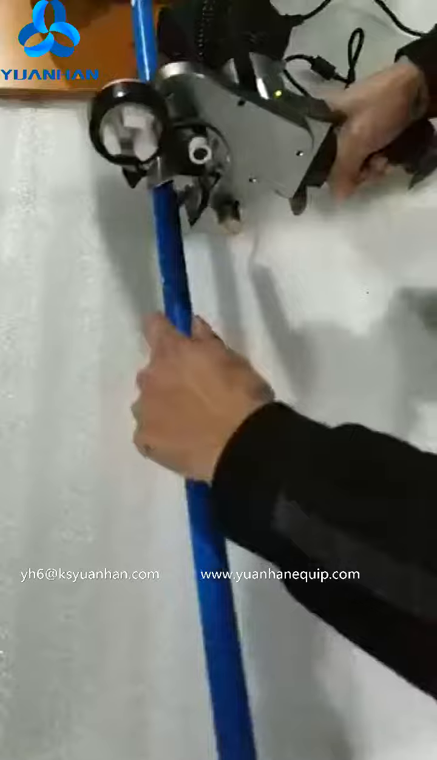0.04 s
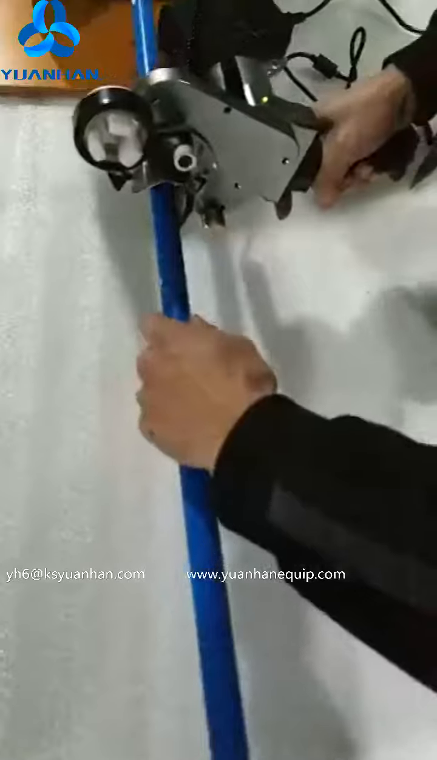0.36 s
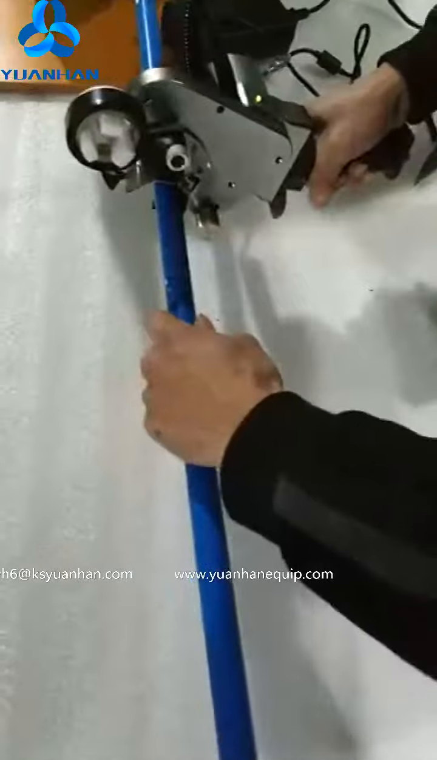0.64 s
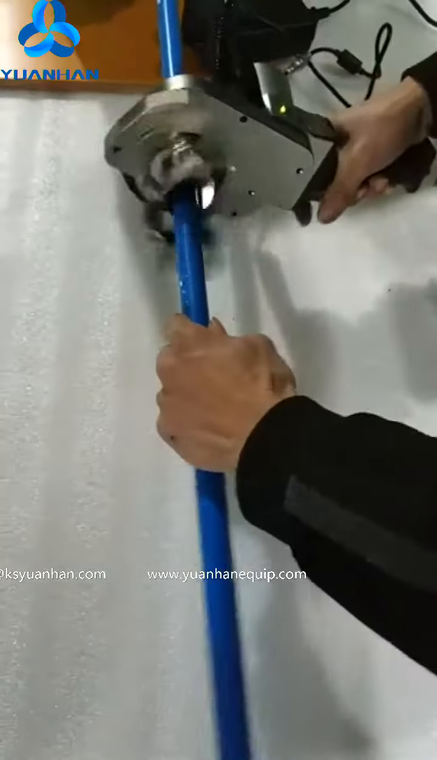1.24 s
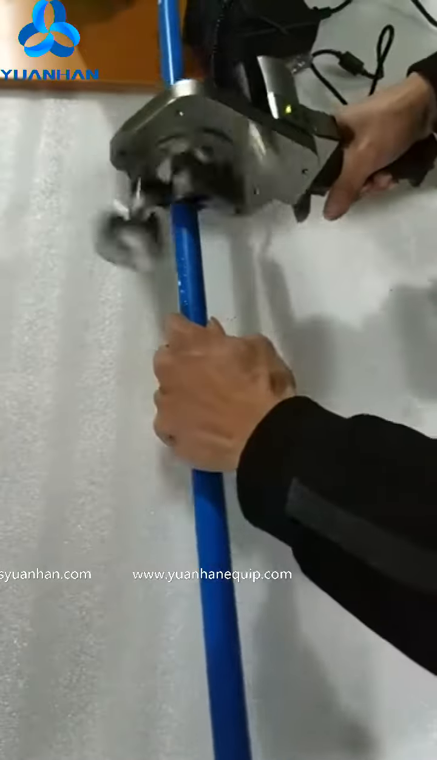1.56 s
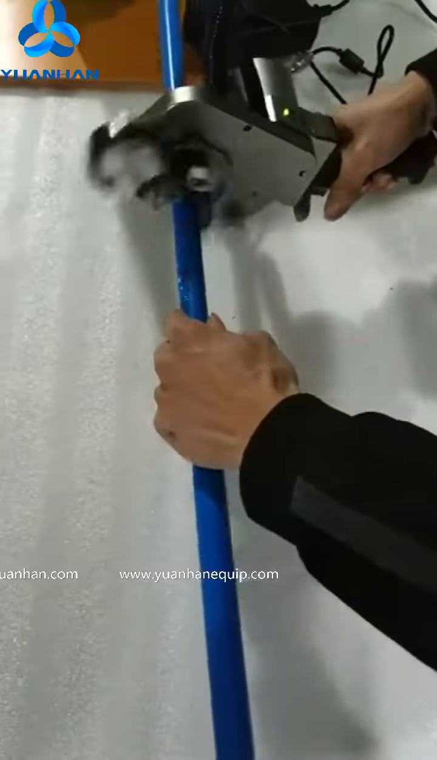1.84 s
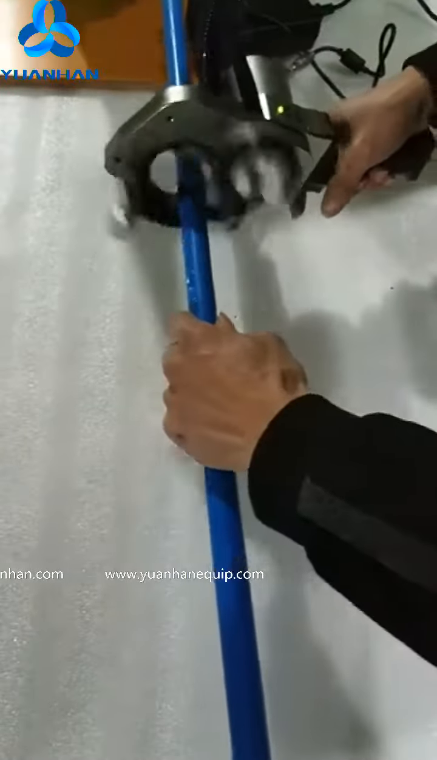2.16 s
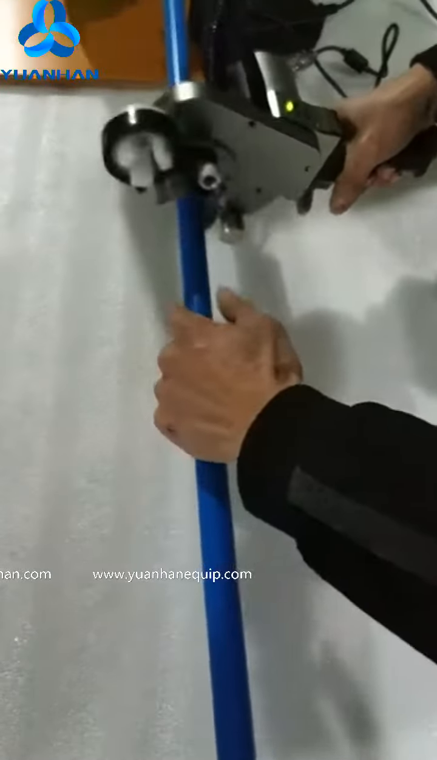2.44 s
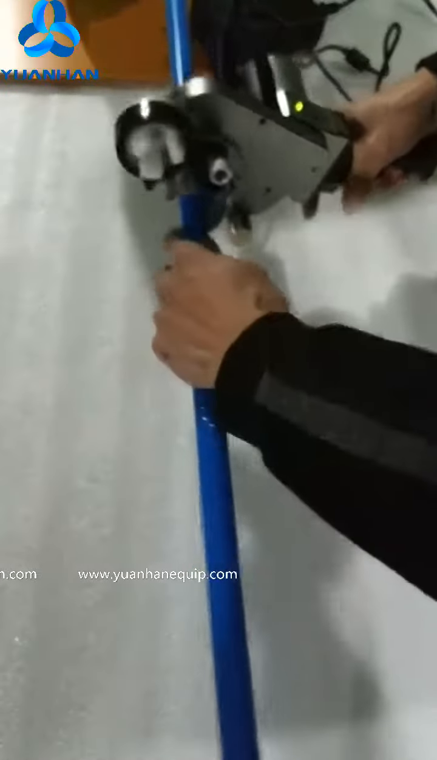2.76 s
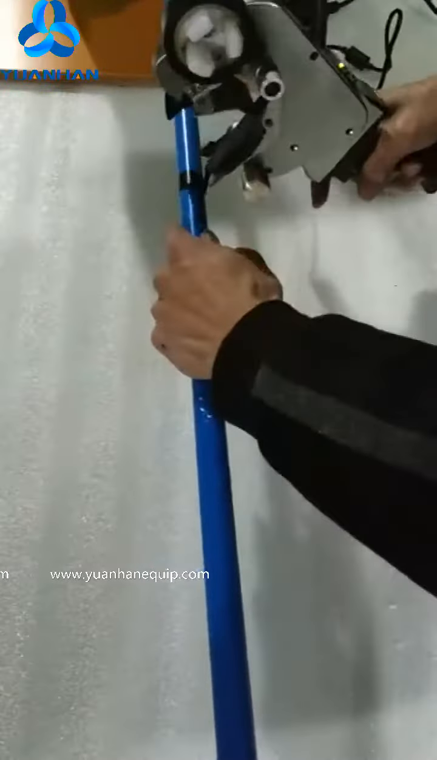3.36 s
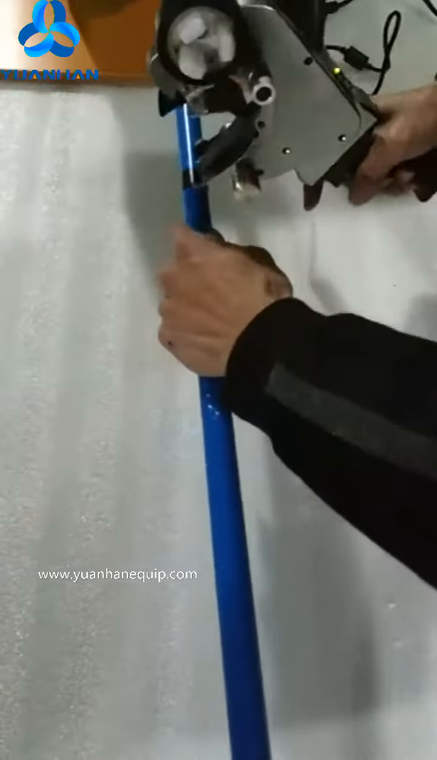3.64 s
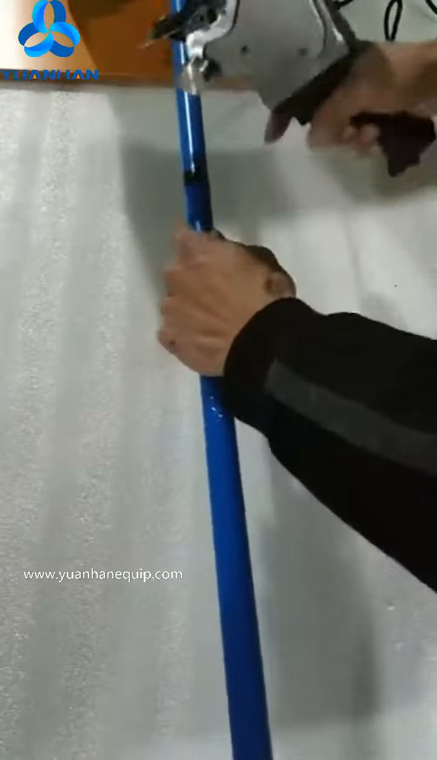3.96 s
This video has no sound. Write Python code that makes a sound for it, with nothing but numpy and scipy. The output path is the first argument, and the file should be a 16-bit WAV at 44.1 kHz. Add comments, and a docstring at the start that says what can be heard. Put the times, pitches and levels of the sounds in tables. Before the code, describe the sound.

Tape crackles off a small spinning wrapping tool, is pulled in short rasps and gets chopped.

```python
"""A workshop hums; then the trigger of a handheld taping machine clicks. Its geared ring spins round a
cable bundle for just over a second, the gear ringing the housing while glue threads snap and crackle off
the tape roll, and it stops with a snap. The tool is drawn away, stripping more tape in short stick-slip
rasps. The cutter chops the tape with a clack and a hollow knock, and loose parts jingle on."""
import sys
import numpy as np
from scipy import signal
from scipy.fft import rfft, irfft, next_fast_len
from scipy.io import wavfile
from scipy.ndimage import uniform_filter1d, map_coordinates

SR = 44100
rng = np.random.default_rng(int(sys.argv[2]) if len(sys.argv) > 2 else 0)


def digitize_waveform(pressure):
    """Quantize a signal to 16-bit integers and store it at the path in sys.argv[1].

    Rows of a 2-D input are taken as channels; values are limited to [-1, 1].
    """
    field = np.atleast_2d(pressure).T
    bounded = np.clip(field, -1, 1)
    quanta = np.round(bounded * 32767).astype(np.int16)
    wavfile.write(sys.argv[1], SR, quanta)


N = 176400

# Workshop background: time_s, rumble_db, air_db
ROOM_LEVELS = [(0.05, -98, -100), (0.09, -61, -58.5), (0.3, -43.5, -48), (0.7, -46.5, -50),
               (1.6, -42.5, -48.5), (2.7, -42, -53.5), (3.5, -43, -51.5), (4.0, -43, -50.5)]
# Two machine hums: time_s, lower_db, upper_db
HUM_LEVELS = [(0.08, -81, -69), (0.5, -49, -56.5), (2.2, -42.5, -54), (2.8, -44, -58.5),
              (3.25, -45.5, -43.5), (4.0, -43, -55.5)]
# Spectra of the rumble and the ventilation: frequency_hz, level_db
RUMBLE_SPECTRUM = [(13, -31), (22, 1.5), (38, -6.5), (54, -1), (102, -8.5), (140, -11.5), (157, -21),
                   (210, -32), (250, -37.5), (320, -55.5), (550, -120)]
AIR_SPECTRUM = [(90, -0.5), (180, 6), (300, -0.5), (600, -2.5), (950, 2), (1400, -9.5), (2100, -16.5),
                (4000, -26), (7400, -27.5), (7800, -62)]
# Left-right likeness of the diffuse field: frequency_hz, coherence
COHERENCE = [(60, 1), (160, 0.97), (280, 1), (500, 0.64), (1100, 0), (3000, 0)]
# Reverberation time of the workshop: frequency_hz, t60_s
REVERB_TIMES = [(200, 0.52), (1000, 0.55), (4000, 0.5), (7500, 0.43)]
# Phase lag of the tool's direct sound on the left: frequency_hz, lag_rad
LEFT_LAG = [(50, .05), (300, 0.33), (700, 1.3), (1300, 1.08), (1900, 1.69), (3000, 4.91), (4000, 4.46),
            (5000, 5.43), (6200, 7.8), (7400, 7.76)]

# Hands rustling, the bundle shifting, the jaw scraping: centre_s, level_db, half_width_s
RUSTLE_SWELLS = [(0.91, -61.5, 0.016), (1.01, -64.5, 0.075), (1.115, -54, 0.047), (2.46, -65, 0.085),
                 (2.72, -61, 0.13), (3.06, -60, 0.018), (3.66, -65, 0.016), (3.77, -67.5, 0.034)]
SHIFT_SWELLS = [(1.66, -43.5, 0.066), (2.67, -39, 0.03), (2.86, -35, 0.13)]
SCRAPE_SWELLS = [(2.865, -40, 0.023), (2.93, -49, 0.05)]
# Their spectra: frequency_hz, level_db
RUSTLE_SPECTRUM = [(250, 6.5), (900, -7), (2000, 2), (3700, -0.5), (5500, 0.5), (7400, 2), (7800, -54),
                   (8500, -99)]
SHIFT_SPECTRUM = [(20, -16.5), (35, 7.5), (52, 15), (70, -6.5), (110, -20), (250, -53.5), (1000, -110)]
SCRAPE_SPECTRUM = [(150, -26.5), (310, -2), (400, -4), (520, -14), (690, 6), (850, -21.5), (1200, -14),
                   (3000, -49), (8000, -84)]

# Modes of the housing: pitch_hz, level_db, t60_s
HOUSING_MODES = [(244, -10.5, 0.046), (307, 0.5, 0.14), (360.3, -7, 0.1), (418.6, -5, 0.099),
                 (511, -11.5, 0.073), (709, -13, 0.11), (1700, -16, 0.027)]
# Knocks on the housing: start_s, level_db, noise_t60_s, relative_thump_db
HOUSING_KNOCKS = [(1.304, -35, 0.057, 7.5), (1.825, -35.5, 0.083, -2.5), (2.301, -39.5, 0.071, -5),
                  (2.876, -35, 0.05, -13), (2.983, -29.5, 0.036, -12), (3.826, -24, 0.052, -3),
                  (3.857, -37.5, 0.038, -9.5)]
# Clicks of trigger, ring and cutter: start_s, level_db, length_s, relative_clack_db, clack_hz
TOOL_CLICKS = [(0.967, -39, 0.0053, -11, 3330), (1.064, -30, 0.0069, -9, 2800),
               (1.162, -37, 0.0074, -11, 2900), (1.176, -22.5, 0.0061, 1.5, 2840),
               (2.358, -27, 0.0068, 1, 2180), (3.718, -46.5, 0.0056, -6.5, 3300),
               (3.797, -47.5, 0.0075, -8, 3380), (3.805, -41.5, 0.0058, -12, 3300),
               (3.8236, -22, 0.0054, -10.5, 2600)]
# Spectrum of a click's clack: pitch_ratio, level_db
CLACK_SPECTRUM = [(.2, -28), (.55, -15.5), (0.801, -12), (1, 2.5), (1.15, -6), (1.42, -1.5), (1.8, -19.5),
                  (3, -45.5)]
# Spectra of a knock's rattle and thump, a click's treble, the loose parts: frequency_hz, level_db
RATTLE_SPECTRUM = [(100, -29), (300, 12), (700, -6.5), (1200, -6.5), (2200, -5), (4000, -20.5),
                   (7000, -34.5), (8500, -66)]
THUMP_SPECTRUM = [(60, -24.5), (150, -2), (300, -6), (450, -17), (1500, -76)]
CLICK_SPECTRUM = [(900, -15), (3000, -1.5), (4300, 2), (5000, 6), (6300, 3.5), (7200, 11.5), (8300, 5),
                  (8800, -41)]
JINGLE_SPECTRUM = [(350, -19), (700, 13), (1100, 4), (1800, 6.5), (2900, 0.5), (4600, -17), (5700, -5.5),
                   (7300, -7.5), (7800, -43)]

# Tape stripped by hand: time_s, level_db
PULL_LEVELS = [(2.814, -56), (2.826, -42), (2.856, -32.5), (2.884, -38.5), (2.904, -34.5), (2.96, -43.5),
               (3.008, -54), (3.098, -56), (3.132, -41), (3.184, -52.5), (3.214, -38), (3.282, -41),
               (3.294, -42), (3.33, -66)]
# Stick-slip cycle of the tape: time_s, rate_hz, jitter_ratio
SLIP_RATES = [(2.821, 1566, .035), (2.862, 1600, 0.03), (2.9, 1530, 0.075), (2.945, 1418, 0.07),
              (3.05, 1450, 0.18), (3.12, 1519, .03), (3.163, 1434, .03), (3.225, 1561, 0.045),
              (3.259, 1838, 0.15), (3.299, 1420, 0.064)]
# The spinning ring: time_s, peel_db, gear_db
SPIN_LEVELS = [(1.192, -36.5, -57), (1.226, -43, -44), (1.246, -40, -59), (1.276, -36.5, -45.5),
               (1.298, -35, -60), (1.31, -35.5, -41), (1.35, -35, -47), (1.41, -37.5, -47.5),
               (1.515, -37.5, -41), (1.538, -38, -51.5), (1.58, -37.5, -40.5), (1.626, -40, -45),
               (1.658, -33.5, -46.5), (1.824, -38.5, -43), (1.946, -40.5, -47.5), (2.03, -37.5, -43.5),
               (2.11, -35.5, -48.5), (2.15, -39.5, -42.5), (2.21, -40.5, -46.5), (2.352, -41.5, -44.5)]
# The roll chattering on its holder: time_s, level_db
CHATTER_LEVELS = [(1.2, -43), (1.27, -43.5), (1.315, -33), (1.41, -37), (1.55, -41), (1.7, -39),
                  (1.97, -41.5), (2.12, -38.5), (2.25, -43.5), (2.355, -40)]
# Modes of the roll and its holder: pitch_hz, bandwidth_hz, level_db
HOLDER_MODES = [(1231, 62, -4), (1600, 37, -6), (1907, 49, 0), (2490, 63, 0.5), (2990, 65, -2),
                (3450, 55, -7), (3810, 54, 1), (4840, 140, -3.5), (7240, 150, -6)]
# Patches of tape popping free: start_s, level_db
TAPE_POPS = [(1.32, -41.5), (1.337, -31.5), (1.419, -34), (1.5, -34.5), (1.632, -34), (1.6772, -25),
             (2.07, -31)]
# Spectra of hand-pulled tape, the gear and the peeling roll: frequency_hz, level_db
PULL_SPECTRUM = [(300, -5.5), (700, -7.5), (1100, -6), (1500, -5.5), (2200, -4.5), (3200, -6.5),
                 (3700, -1.5), (4800, 5), (5800, -5), (7300, 7), (7520, 9.5), (7800, -64)]
GEAR_SPECTRUM = [(65, -35.5), (110, -6), (182, -9.5), (301, -3.5), (497, -3), (579, -7), (776, -8),
                 (1200, -22), (1800, -19.5), (2340, -38), (3960, -120)]
PEEL_SPECTRUM = [(500, -23), (900, -14.5), (1250, -6), (1650, -11.5), (2200, 1), (3000, -4), (4000, -0.5),
                 (5000, -2.5), (6100, -3.5), (7150, 4.5), (7480, 4), (7900, -53)]

TIME = np.arange(N) / SR


def amp(db):
    """Amplitude grows tenfold for every 20 dB."""
    return 10 ** (np.asarray(db) / 20)


def unit(x):
    """Normalisation to an rms of 1."""
    return x / np.sqrt(np.mean(x ** 2) + 1e-20)


def along(points, hz):
    """Interpolation on a logarithmic frequency axis."""
    frequencies, values = np.transpose(points)
    return np.interp(np.log(hz + 1), np.log(frequencies + 1), values)


def envelopes(rows):
    """Amplitude envelopes, one per dB column, fading within 10 ms outside the table's span."""
    times, *columns = np.transpose(rows)
    gate = np.interp(TIME, [times[0] - .01, times[0], times[-1], times[-1] + .01], [0, 1, 1, 0])
    return [gate * amp(np.interp(TIME, times, db)) for db in columns]


def swells(rows):
    """Superposition of Gaussian envelopes."""
    return sum(amp(db) * np.exp(-.5 * ((TIME - centre) / width) ** 2) for centre, db, width in rows)


def wobble(knots_per_s):
    """Smooth random modulation: a spline through Gaussian values."""
    return map_coordinates(rng.standard_normal(1024), [TIME * knots_per_s], mode="mirror")


def snaps(per_s, spread_db):
    """A Poisson process: independent impulses of random size and sign."""
    size = amp(spread_db * np.minimum(rng.exponential(size=N), 6))
    return (rng.random(N) < per_s / SR) * size * rng.choice([-1, 1], N)


def filtered(x, response):
    """Linear filtering multiplies the spectrum by a frequency response."""
    length = x.shape[-1]
    padded = next_fast_len(length + 8192)
    return irfft(rfft(x, padded) * response(np.fft.rfftfreq(padded, 1 / SR)), padded)[..., :length]


def lowpass(x, cutoff_hz, order):
    """Zero-phase low-pass filtering, steeper with higher order."""
    return filtered(x, lambda hz: 1 / (1 + (hz / cutoff_hz) ** order))


def coloured(x, spectrum):
    """Spectral shaping, normalised to an rms of 1."""
    return unit(filtered(x, lambda hz: amp(along(spectrum, hz))))


def resonance(hz, pitch_hz, bandwidth_hz):
    """A damped oscillator responds most at its natural frequency."""
    damping = 1j * hz * bandwidth_hz
    return damping / (pitch_hz ** 2 - hz ** 2 + damping)


def delayed(x, delay_s):
    """A changing delay shifts pitch in proportion to its rate of change."""
    return map_coordinates(x, [(TIME - delay_s) * SR])


def add(track, start_s, sound):
    """Superposition: a sound adds to the track from start_s on."""
    part = track[round(start_s * SR):][:len(sound)]
    part += sound[:len(part)]


def diffuse(pair):
    """A diffuse field is coherent between two points only at long wavelengths."""
    angle = lambda hz: np.arccos(np.clip(along(COHERENCE, hz), -1, 1)) / 2
    mid, side = filtered(pair, lambda hz: np.array([np.cos(angle(hz)), np.sin(angle(hz))]))
    return np.array([mid + side, mid - side])


def in_room(x, room_db):
    """Reverberation follows the direct sound; its impulse response changes as the tool moves."""
    wet = np.zeros((2, N + SR))
    hop, predelay = SR // 8, SR // 250
    for start in range(0, N, hop):
        piece = x[None, start:start + hop]
        if np.abs(piece).max() > 1e-4:
            hz, t, noise = signal.stft(rng.standard_normal((2, SR // 2)), SR, nperseg=256)
            decay = amp(-60 * t / along(REVERB_TIMES, hz)[:, None])
            tail = signal.istft(noise * decay, SR, nperseg=256)[1]
            echoes = signal.fftconvolve(piece, tail / np.linalg.norm(tail[0]), axes=1)
            wet[:, start + predelay:][:, :echoes.shape[1]] += echoes
    wet = lowpass(diffuse(wet[:, :N]), cutoff_hz=7650, order=90)
    direct = filtered(x, lambda hz: np.exp(.5j * along(LEFT_LAG, hz) * np.array([[-1], [1]])))
    return (direct + amp(room_db) * wet) / np.hypot(1, amp(room_db))


def workshop(hum_hz=(48.5, 94.5)):
    """Rumble and ventilation form a diffuse field; distant machines hum, wavering in level and phase."""
    hum = np.zeros(N)
    for hz, level in zip(hum_hz, envelopes(HUM_LEVELS)):
        peak = np.sqrt(2) * level * amp(0.67 * wobble(6.0))
        hum += peak * np.sin(2 * np.pi * hz * TIME + 0.5 * wobble(4.53))
    rumble_level, air_level = envelopes(ROOM_LEVELS)
    rumble = coloured(diffuse(rng.standard_normal((2, N))), RUMBLE_SPECTRUM)
    air = coloured(diffuse(rng.standard_normal((2, N))), AIR_SPECTRUM)
    return rumble_level * rumble + air_level * air + hum


def offset_step(start_s=0.3, gain_db=-21, rise_s=0.035, fall_s=0.15):
    """Step response: the microphone's offset jumps and settles, a barely audible subsonic thump."""
    t = np.maximum(TIME - start_s, 0)
    return amp(gain_db) * (1 - np.exp(-t / rise_s)) * np.exp(-t / fall_s)


def hands():
    """Friction of skin and cloth makes broadband noise; the shifted bundle rumbles."""
    rustle = coloured(diffuse(rng.standard_normal((2, N))), RUSTLE_SPECTRUM)
    rumble = coloured(rng.standard_normal(N), SHIFT_SPECTRUM)
    return rustle * swells(RUSTLE_SWELLS) + rumble * swells(SHIFT_SWELLS)


def scraping():
    """Sliding friction: the jaw judders along the bundle in irregular impulses."""
    return coloured(snaps(per_s=400, spread_db=3.5), SCRAPE_SPECTRUM) * swells(SCRAPE_SWELLS)


def jingling(start_s=3.838, level_db=-39.5, t60_s=0.78):
    """Collisions of loose parts decay exponentially after the cut."""
    t = TIME - start_s
    collisions = coloured(snaps(per_s=600, spread_db=0), JINGLE_SPECTRUM)
    return collisions * (t > 0) * amp(level_db - 60 * np.abs(t) / t60_s)


def knocks(ring_db=-2.5, rise_s=0.00028):
    """Impact excitation: a jolt thumps, rattles loose parts and rings the housing's damped modes."""
    out, t = np.zeros(N), np.arange(SR // 4) / SR
    for start_s, db, noise_t60_s, thump_db in HOUSING_KNOCKS:
        ring = np.zeros(len(t))
        for k, (hz, mode_db, t60_s) in enumerate(HOUSING_MODES):
            decay = amp(mode_db + rng.normal(0, 3.0) - 60 * t / t60_s)
            ring += (-1) ** k * decay * np.sin(2 * np.pi * hz * t)
        rattle = coloured(rng.standard_normal(len(t)), RATTLE_SPECTRUM)
        thump = coloured(rng.standard_normal(len(t)), THUMP_SPECTRUM)
        noise = (rattle + amp(thump_db) * thump) * amp(-60 * t / noise_t60_s)
        attack = 1 - np.exp(-t / rise_s)
        add(out, start_s, amp(db) * attack * (amp(ring_db) * ring + noise))
    return out


def clicks(rise_s=0.0016):
    """Brief contact gives a broad spectrum: hard parts meet in milliseconds of chatter."""
    out, t = np.zeros(N), np.arange(SR // 20) / SR
    for start_s, db, length_s, clack_db, clack_hz in TOOL_CLICKS:
        treble = coloured(rng.standard_normal(len(t)), CLICK_SPECTRUM)
        spectrum = [(ratio * clack_hz, level_db) for ratio, level_db in CLACK_SPECTRUM]
        clack = coloured(rng.standard_normal(len(t)), spectrum)
        envelope = (1 - np.exp(-(t / rise_s) ** 2)) / (1 + (t / length_s) ** 4)
        add(out, start_s, amp(db) * envelope * (treble + amp(clack_db) * clack))
    return out


def stripping(squawk_db=0.5, rasp_db=-1):
    """Stick-slip oscillation: hand-pulled tape squawks at a ragged rate, over loose crackle."""
    level, = envelopes(PULL_LEVELS)
    ragged = unit(uniform_filter1d(rng.standard_normal(N), size=24))
    times, hz, jitter = np.transpose(SLIP_RATES)
    slip_hz = np.interp(TIME, times, hz) * (1 + np.interp(TIME, times, jitter) * ragged)
    phase = 2 * np.pi * np.cumsum(slip_hz) / SR
    harmonics = sum(np.sin(k * phase) for k in range(1, 5))
    squawk = coloured(harmonics * amp(2.7 * wobble(200)), PULL_SPECTRUM)
    rasp = coloured(snaps(per_s=1800, spread_db=2.0), PULL_SPECTRUM)
    return level * (amp(squawk_db) * squawk + amp(rasp_db) * rasp)


def housing(hz):
    """The housing's response is a sum of modes, each with bandwidth inverse to its decay time."""
    return sum((-1) ** k * amp(db) * resonance(hz, pitch_hz, np.log(1000) / np.pi / t60_s)
               for k, (pitch_hz, db, t60_s) in enumerate(HOUSING_MODES))


def gears(tooth_hz=62, tooth_depth=0.18):
    """Forced vibration: gear impacts, modulated at the tooth rate, keep the housing ringing."""
    _, level = envelopes(SPIN_LEVELS)
    tooth_phase = 2 * np.pi * np.cumsum(tooth_hz * (1 + 0.013 * wobble(2.9))) / SR
    impacts = snaps(per_s=1000, spread_db=-0.5) * (1 + tooth_depth * np.sin(tooth_phase))
    rattle = filtered(impacts, lambda hz: 0.39 + housing(hz))
    whirr = delayed(rattle, np.cumsum(0.0308 * wobble(9)) / SR)  # pitch wavers with the load
    return coloured(whirr, GEAR_SPECTRUM) * level * amp(1.7 * wobble(25.27))


def circling(x, turns_per_s=2.55, delay_s=0.0021, swing_s=0.00021, echo_gain=0.5):
    """Comb filtering: the roll's echo off the bench travels a path that varies with every turn."""
    lag_s = delay_s + swing_s * np.sin(2 * np.pi * turns_per_s * TIME)
    return lowpass(x + echo_gain * delayed(x, lag_s), cutoff_hz=7600, order=120)


def chatter(flare_db=3.5, pitch_waver=0.03):
    """Resonance: the jiggling roll rings its holder, each mode flaring on its own."""
    level, = envelopes(CHATTER_LEVELS)
    jolts = snaps(per_s=300, spread_db=1.0)
    ring = np.zeros(N)
    for pitch_hz, bandwidth_hz, db in HOLDER_MODES:
        mode = filtered(jolts, lambda hz: resonance(hz, pitch_hz, bandwidth_hz))
        ring += amp(db + flare_db * wobble(17)) * mode
    ring = delayed(ring, np.cumsum(pitch_waver * wobble(11)) / SR)  # pitch wavers with the tape's pull
    return level * unit(circling(ring))


def peeling(gain_db=3, flicker_db=1.75, pop_s=0.0056):
    """Adhesive fracture: glue threads snap off the circling roll, and bigger patches pop free."""
    level, _ = envelopes(SPIN_LEVELS)
    threads = coloured(circling(snaps(per_s=3000, spread_db=2)), PEEL_SPECTRUM)
    out = threads * level * amp(gain_db + flicker_db * wobble(110))
    t = np.arange(SR // 50) / SR
    for start_s, db in TAPE_POPS:
        burst = coloured(rng.standard_normal(len(t)), PEEL_SPECTRUM)
        add(out, start_s, amp(db) * burst / (1 + (t / pop_s) ** 4))
    return lowpass(out, cutoff_hz=7600, order=120)


def scene():
    """Superposition of tool and workshop, each tool sound with its own share of reverberation."""
    tool = in_room(peeling() + chatter(), room_db=-4.0)
    tool += in_room(gears(), room_db=-0.5)
    tool += in_room(stripping(), room_db=-8.5)
    tool += in_room(clicks() + jingling(), room_db=-11.0)
    tool += in_room(knocks() + scraping(), room_db=-2.5)
    return tool + hands() + workshop() + offset_step()


def record(dry):
    """Band limiting: a steep low-pass removes the top treble."""
    return lowpass(dry, cutoff_hz=8900, order=100)


dry = scene()
out = record(dry)
digitize_waveform(out)
```